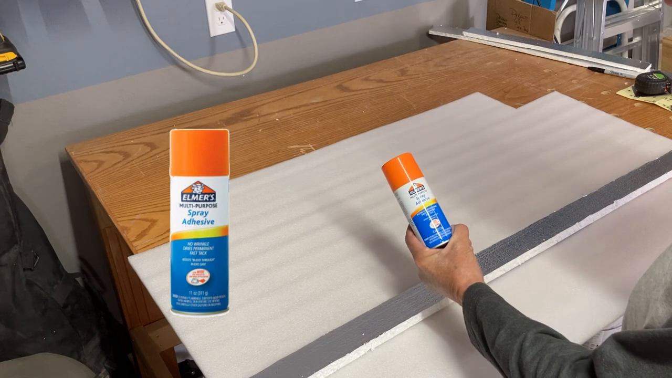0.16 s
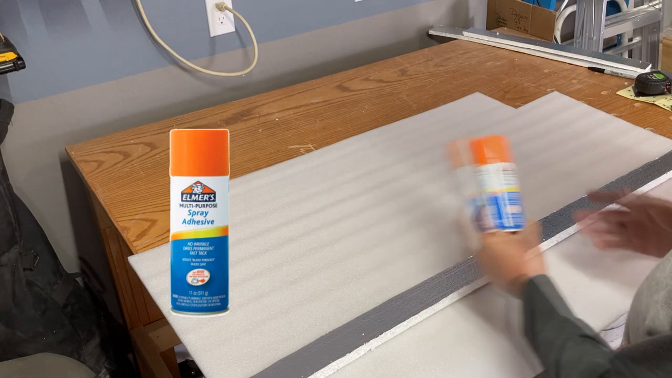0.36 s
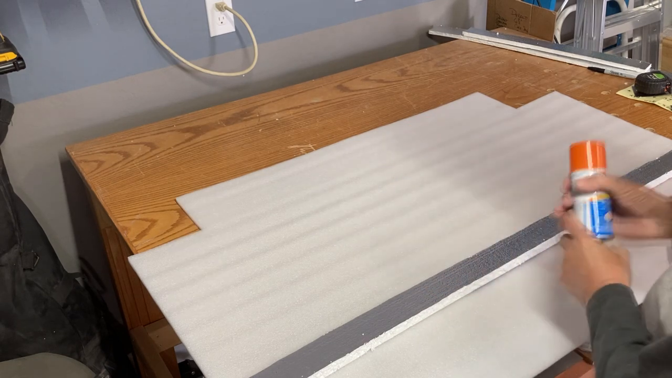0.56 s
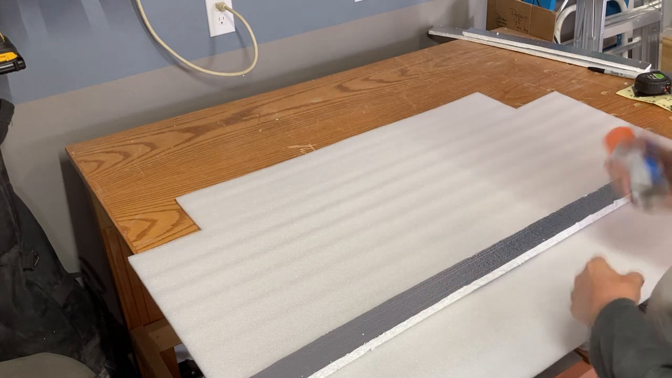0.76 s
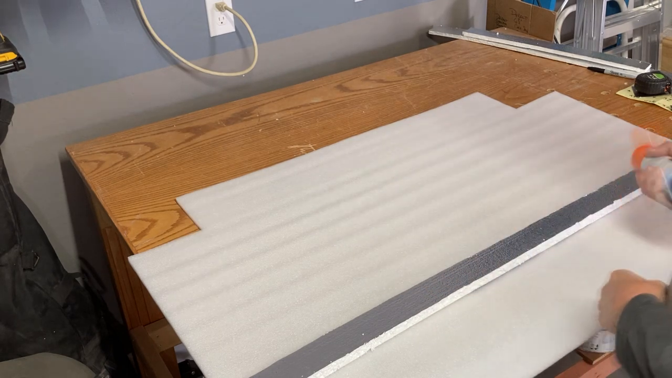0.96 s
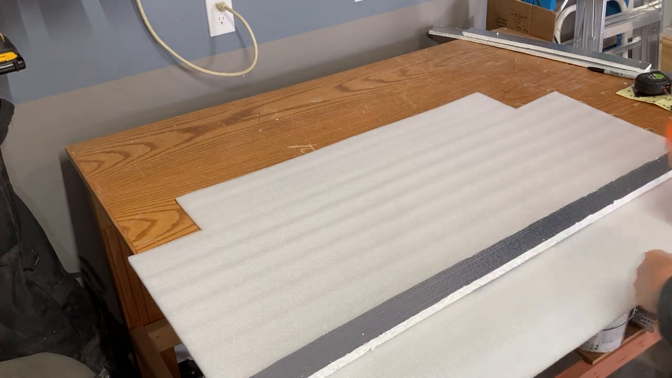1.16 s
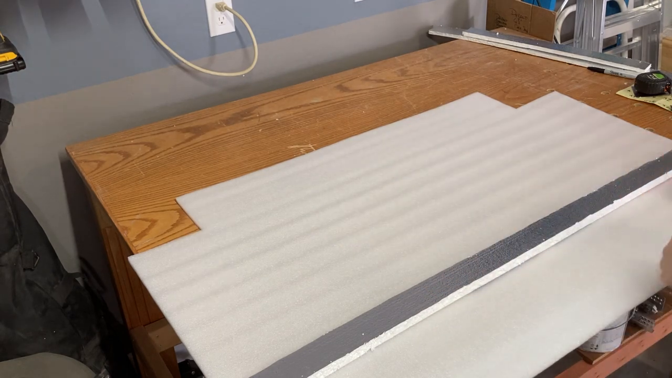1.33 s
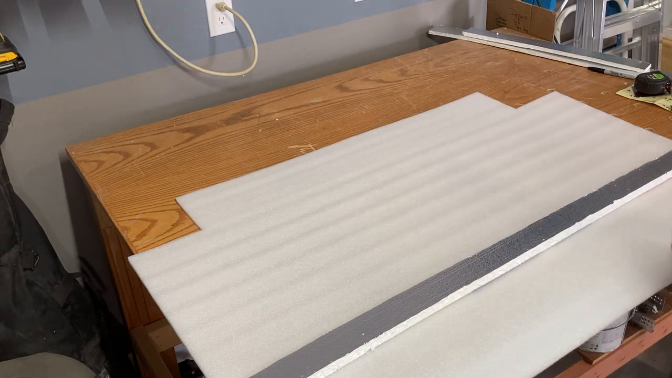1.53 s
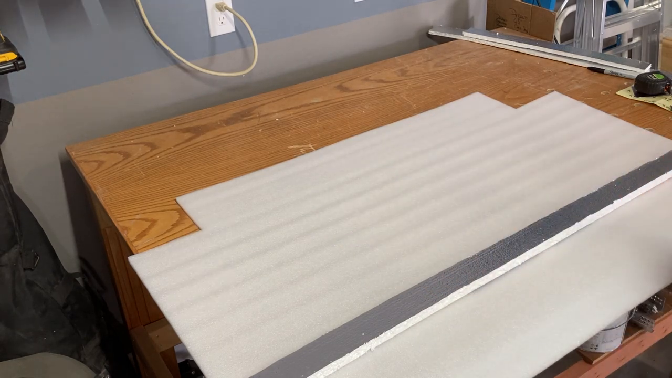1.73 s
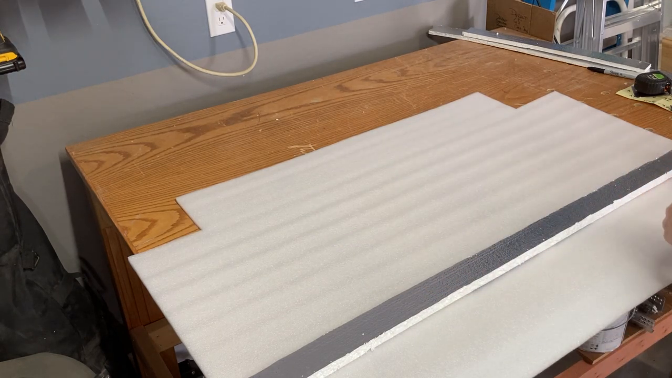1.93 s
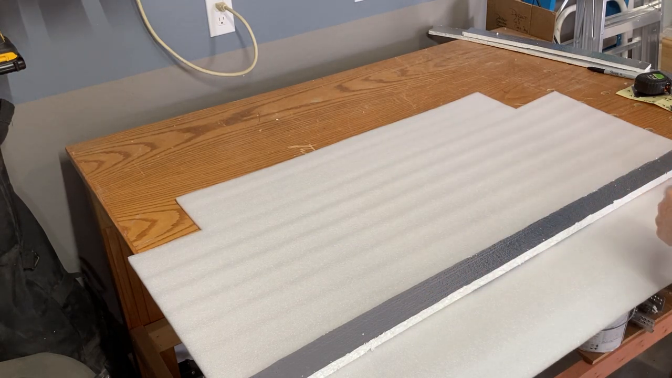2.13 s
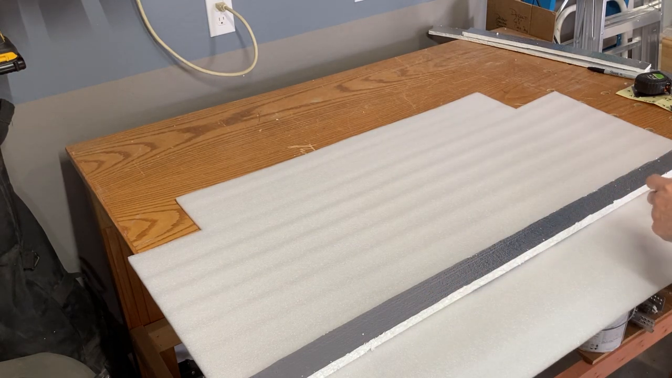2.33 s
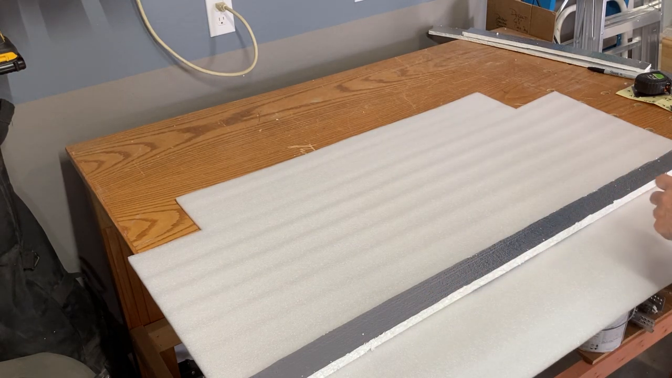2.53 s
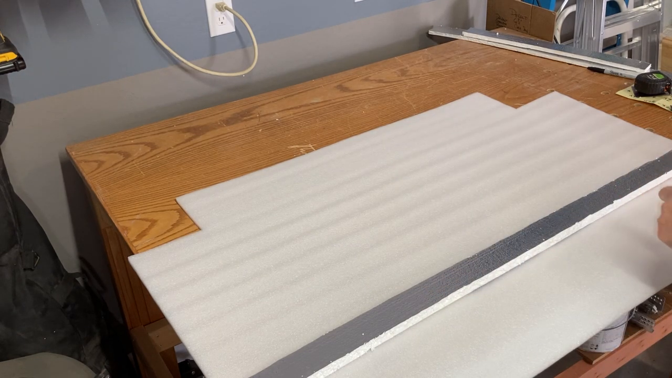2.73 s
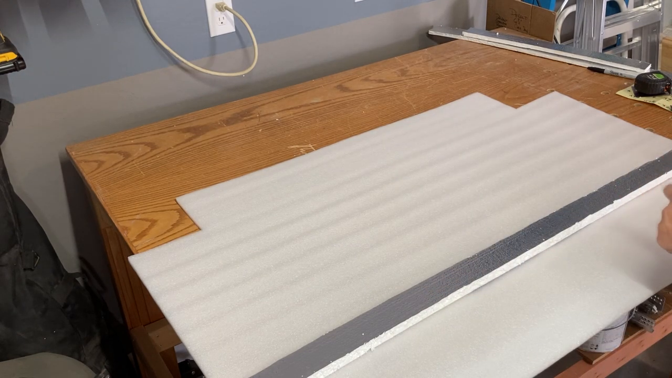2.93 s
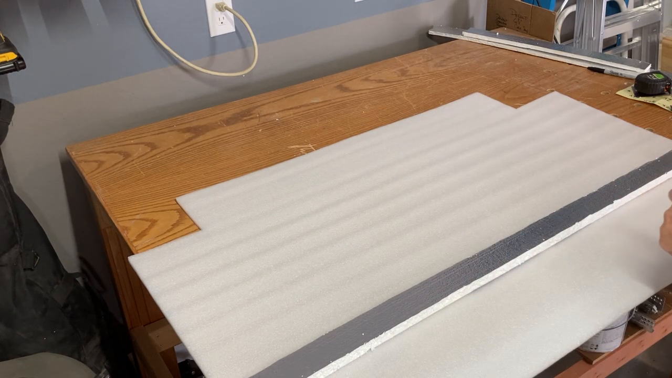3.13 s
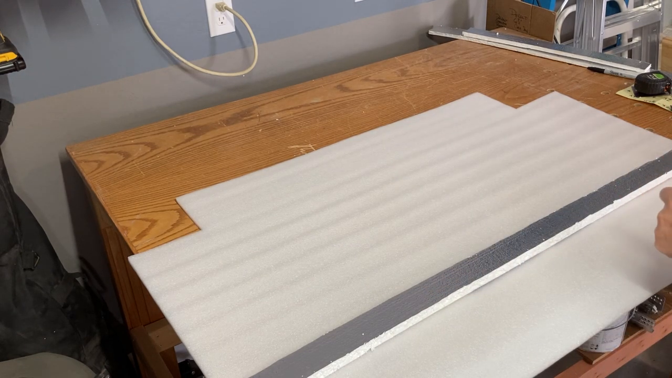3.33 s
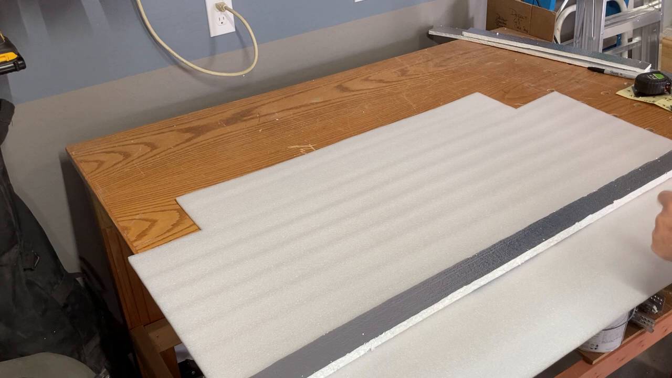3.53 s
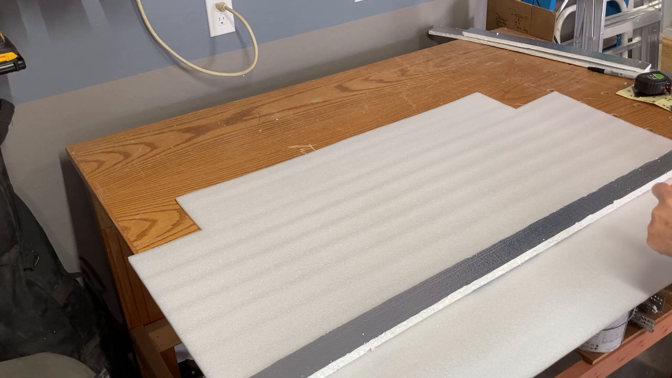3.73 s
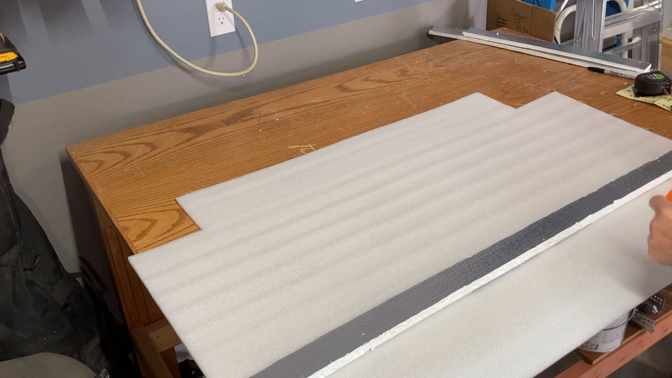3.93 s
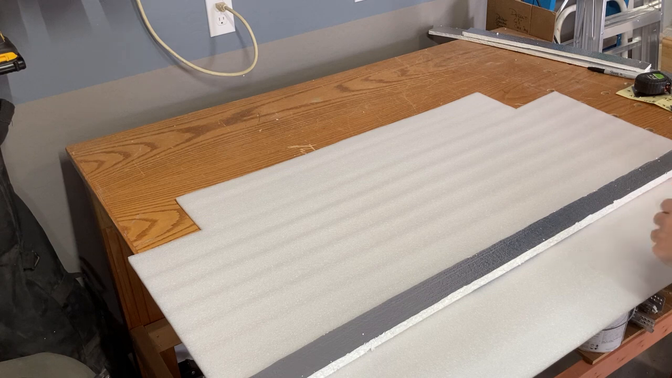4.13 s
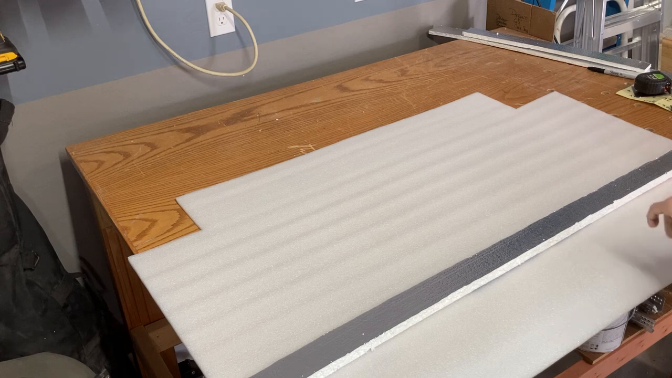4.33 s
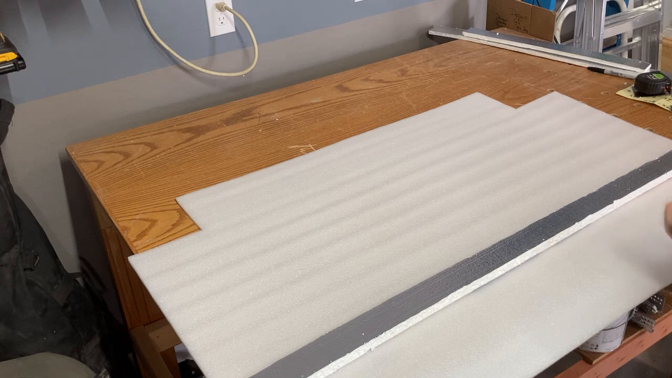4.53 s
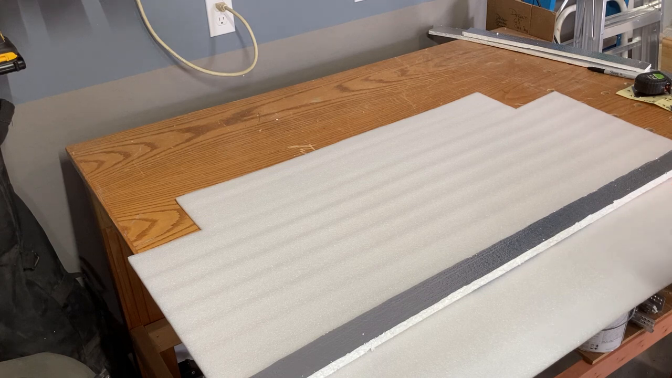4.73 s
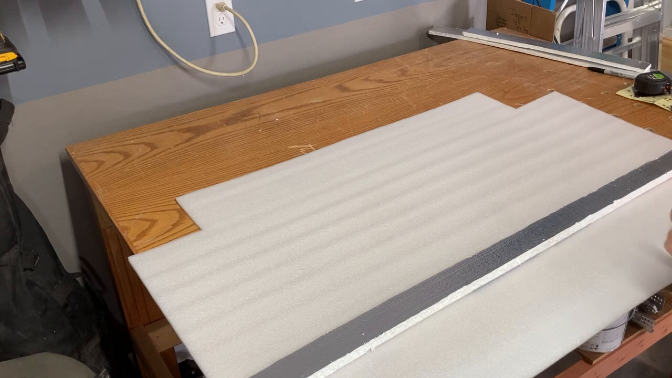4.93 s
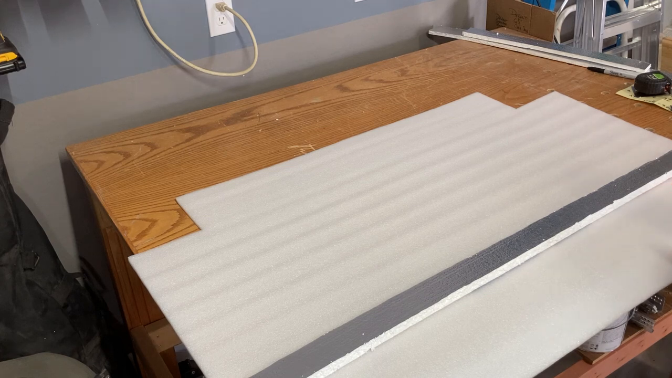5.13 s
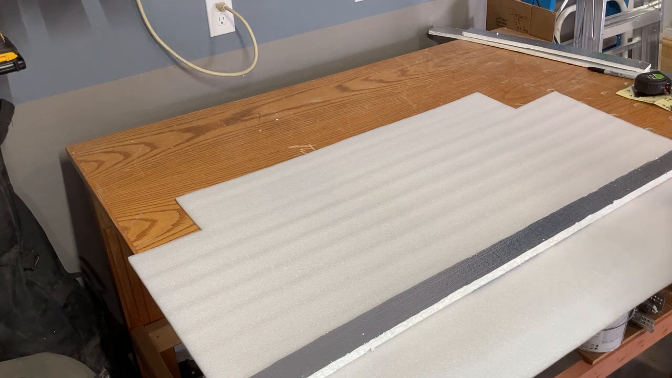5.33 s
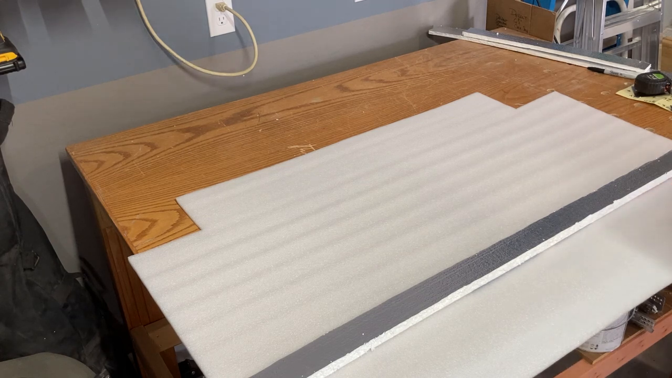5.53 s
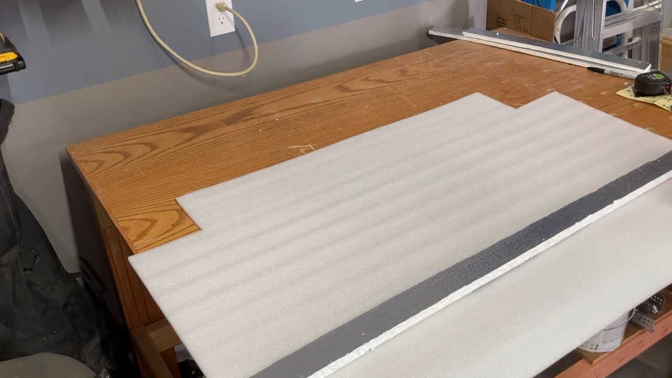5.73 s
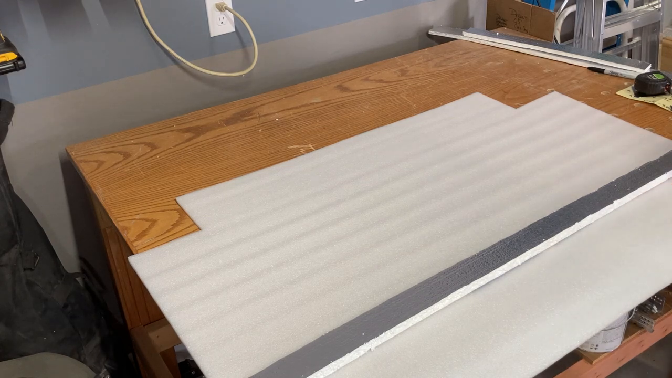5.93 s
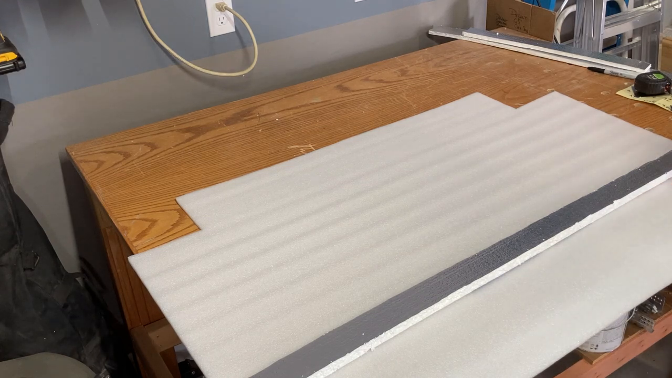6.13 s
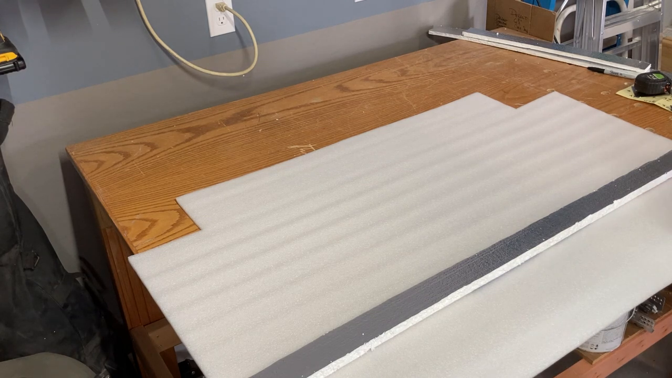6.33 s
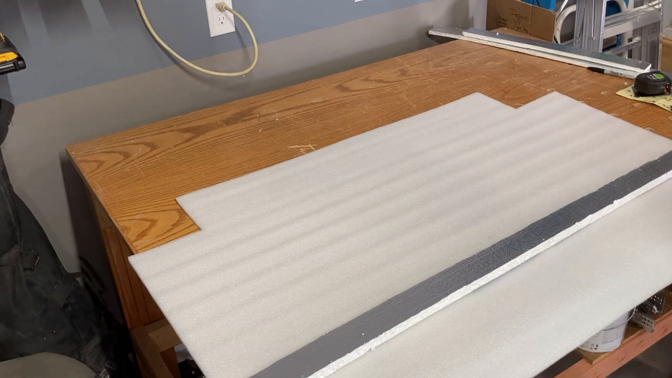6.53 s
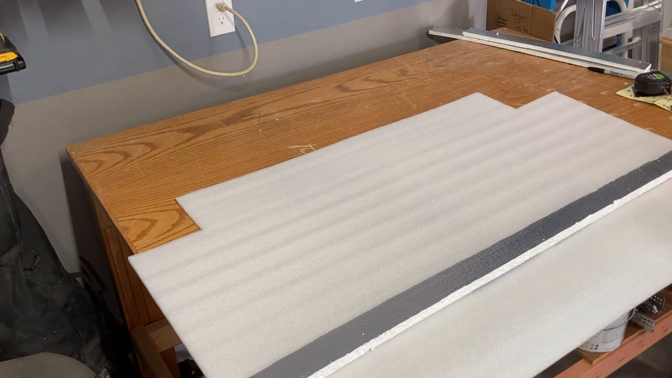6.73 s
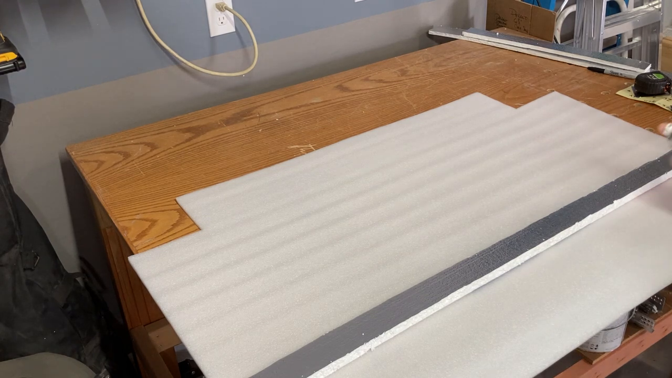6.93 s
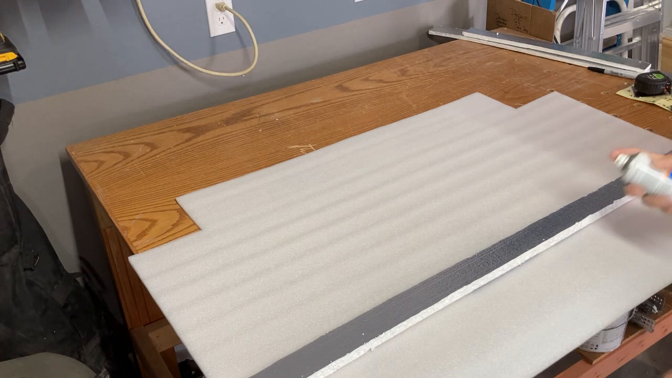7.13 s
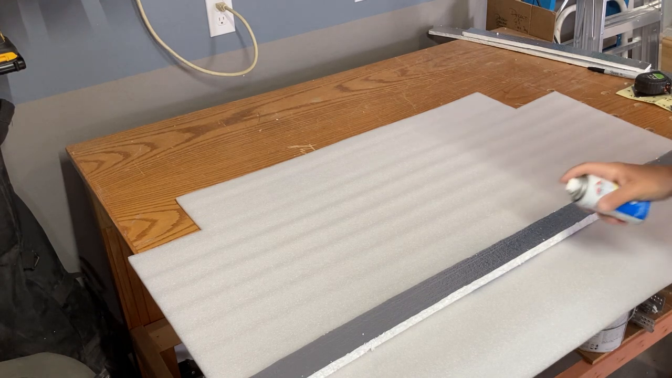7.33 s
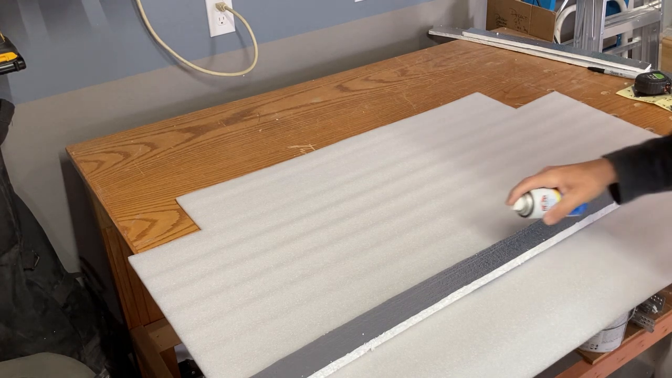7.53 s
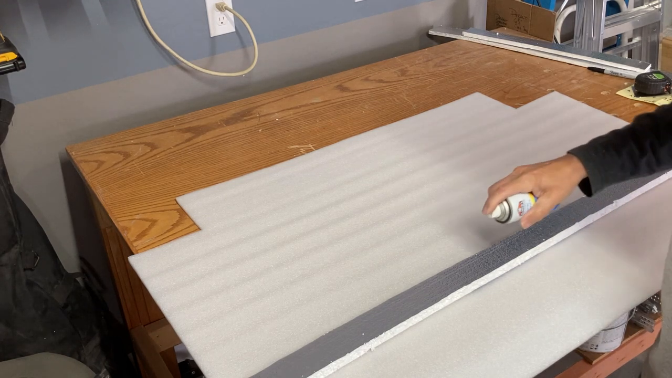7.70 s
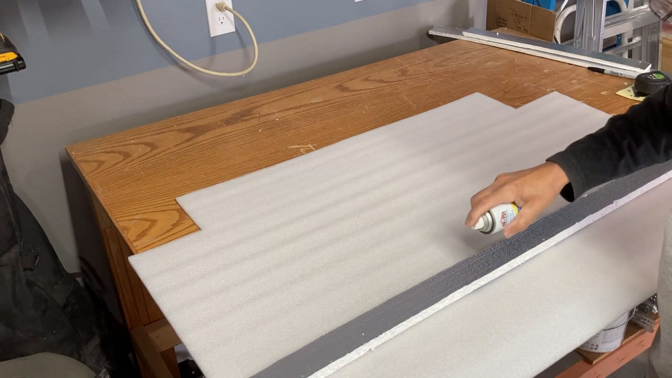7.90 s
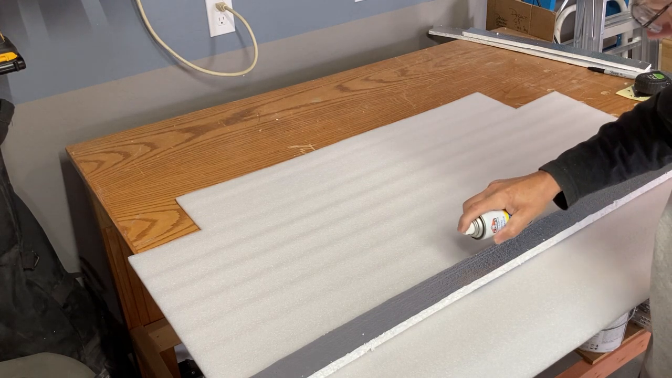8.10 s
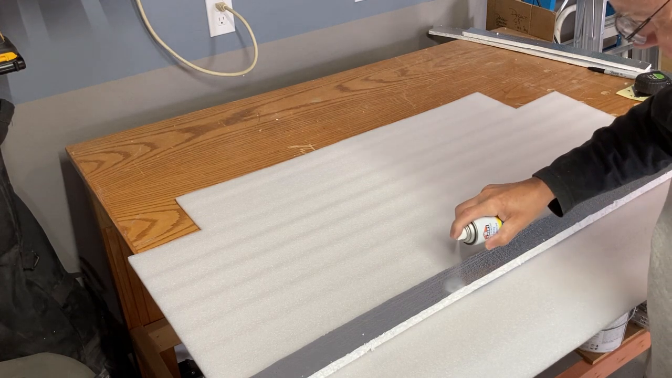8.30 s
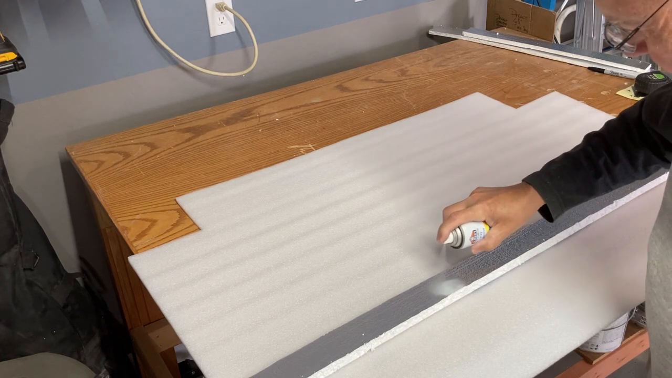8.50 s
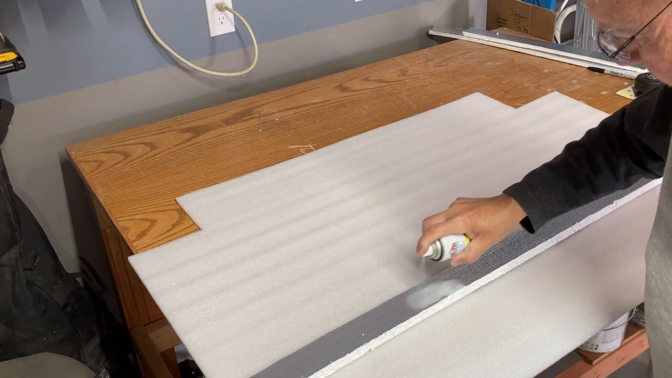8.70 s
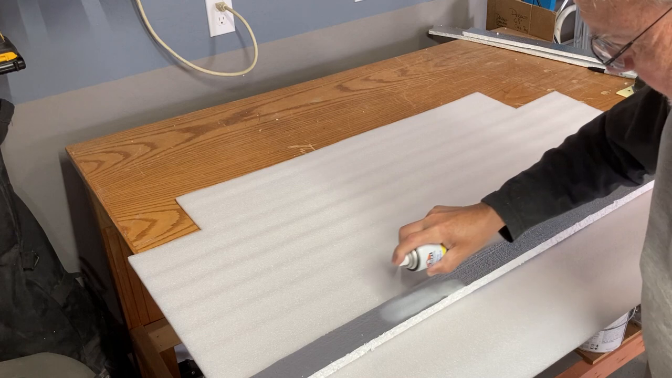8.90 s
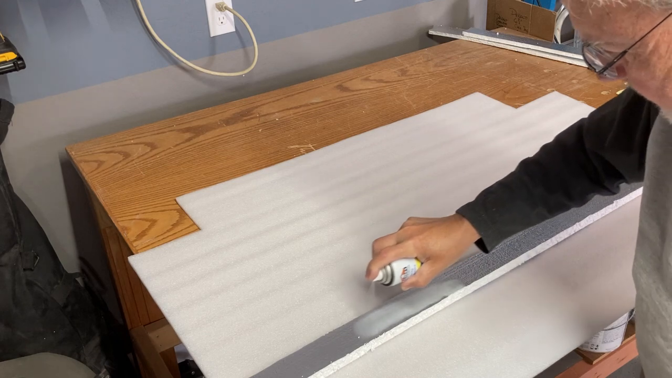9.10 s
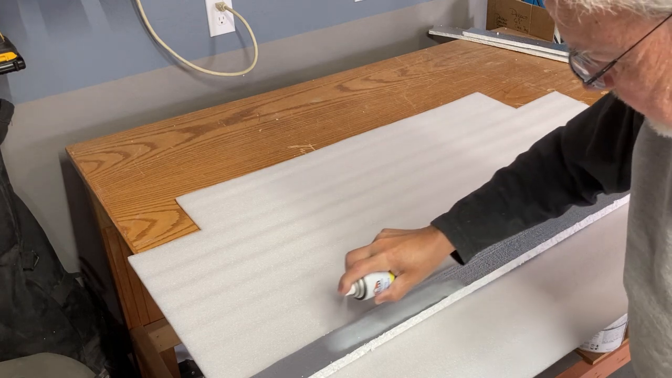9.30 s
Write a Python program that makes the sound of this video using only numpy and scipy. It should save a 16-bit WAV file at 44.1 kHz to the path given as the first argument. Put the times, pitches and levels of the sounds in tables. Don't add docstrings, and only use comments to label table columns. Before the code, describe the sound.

In a bare garage, an aerosol can is shaken briskly, its loose ball clacking irregularly on thin metal. Quieter sleeve rustles and small clicks follow, with a thump and hollow plastic pops as the cap works loose. After a near-quiet pause the nozzle clicks and bright glue spray hisses until the end. A close stereo microphone catches short room reverberation over faint low rumble.

```python
import sys
import numpy as np
from scipy import signal
from scipy.fft import rfft, irfft, next_fast_len
from scipy.io import wavfile
from scipy.ndimage import map_coordinates

SR = 44100
rng = np.random.default_rng(int(sys.argv[2]) if len(sys.argv) > 2 else 0)


def invert_db(x):
    u = np.asarray(x, float) / 20
    return 10 ** u


def wav_out(sig):
    wavfile.write(sys.argv[1], SR, np.round(np.clip(np.atleast_2d(sig).T, -1, 1) * 32767).astype(np.int16))


N = 417186
STEADY_TOP_HZ = 15850
SWELL_DB, FADE_DB_PER_S = 27, 174.5


def at_hz(points, hz):
    table_hz, value = np.array(points).T
    return np.interp(np.log(hz + 1), np.log(table_hz), value)


def in_time(rows):
    s, *columns = np.transpose(rows)
    return [np.interp(np.arange(N) / SR, s, column) for column in columns]


def rms_one(x):
    return x / np.sqrt(np.mean(x ** 2) + 1e-20)


def drift(rate_hz):
    r = np.exp(-80 * np.pi * rate_hz / SR)
    slow = signal.lfilter([1], [1, -2 * r, r * r], rng.standard_normal(N // 40 + 2002))[2000:]
    return np.interp(np.arange(N) / 40, np.arange(len(slow)), rms_one(slow))


def coloured(spectrum, channels=1):
    size = next_fast_len(N)
    hz = np.fft.rfftfreq(size, 1 / SR)
    shape = invert_db(at_hz(spectrum, hz)) * (hz < STEADY_TOP_HZ)
    white = rng.standard_normal((channels, size))
    return rms_one(irfft(rfft(white) * shape, size)[:, :N])


def tent(peak_s, peak_db, rise_db_per_s, fall_db_per_s):
    t = np.arange(N) / SR - peak_s
    slope_db = np.minimum(rise_db_per_s * t, -fall_db_per_s * t)
    return invert_db(np.maximum(peak_db + slope_db, -200))


def friction_stroke(peak_s, swell_s, db):
    return tent(peak_s, db, SWELL_DB / max(swell_s, .005), FADE_DB_PER_S)


def resonance(x, hz, t60):
    r = invert_db(-60 / (t60 * SR))
    out = signal.lfilter([1, 0, -1], [1, -2 * r * np.cos(2 * np.pi * hz / SR), r * r], x)
    return out / np.abs(out).max()


def impulse(seconds):
    return 1. * (np.arange(int(seconds * SR)) == 0)


def add(out, s, sound):
    at = round(s * SR)
    out[at:at + len(sound)] += sound[:N - at]


def clacks(events, bench_db, rough, scuff_s, wall_db, crack_db):
    ring_t60_s = .009
    wall_hz, wall_t60_s, wall_spread = 3700, 0.0015, .12
    crack_hz, crack_t60_s = 9720, 0.00079
    body_hz, body_t60_s, body_db = 615, 0.0032, -5.5
    ring_reach, wall_reach, crack_reach = invert_db([[0], [-1.5]]), invert_db([[0], [1]]), invert_db([[0], [-6]])
    bench_echo_ms = 6.7

    out = np.zeros((N, 2))
    t = np.arange(int(.05 * SR)) / SR
    even = (t == 0) * np.sqrt(1 + rough ** 2 * np.sum(invert_db(-120 * t / scuff_s)))
    scuffs = rng.standard_normal((len(events), 3, len(t)))
    for (s, ring_db, hz, click_db), scuff in zip(events, scuffs):
        contact = (t == 0) + rough * scuff * invert_db(-60 * t / scuff_s)
        this_wall_hz = wall_hz * np.exp(wall_spread * scuff[0, -1])
        ring = invert_db(ring_db + 6.5) * ring_reach * resonance([contact[0], even], hz, ring_t60_s)
        wall = invert_db(click_db + wall_db) * wall_reach * resonance([contact[1], even], this_wall_hz, wall_t60_s)
        crack = invert_db(click_db + crack_db) * crack_reach * resonance([contact[2], even], crack_hz, crack_t60_s)
        body = invert_db(click_db + body_db) * resonance([contact[1], even], body_hz, body_t60_s)
        add(out, s, (ring - wall + crack - body).T)
    direct, around = signal.sosfilt(signal.butter(1, 600.0, "high", fs=SR, output="sos"), out.T)
    bench_echo = invert_db(bench_db) * np.roll(direct, round(bench_echo_ms * SR / 1000))
    return np.array([direct + bench_echo, around])


def shaken_can():
    # start_s, hollow_ring_db, ring_hz, click_db
    strikes = [(0.7189, -25, 2120, -27), (0.8089, -29, 1640, -36), (0.898, -29.5, 1760, -32),
               (0.9408, -20, 1690, -27.5), (1.0326, -29, 1150, -17), (1.2108, -23, 1560, -26.5),
               (1.4106, -20, 1880, -24), (1.501, -24.5, 1640, -24), (1.6168, -23, 1205, -23.5),
               (1.698, -13, 2090, -24), (1.743, -33.5, 2140, -27.5), (1.8476, -21, 2060, -19.5),
               (1.9076, -20, 1880, -27), (1.949, -18, 2070, -24.5), (2.0436, -15, 2080, -17.5),
               (2.148, -32, 1800, -36), (2.2418, -25.5, 1090, -15), (2.3291, -22.5, 2060, -22.5),
               (2.379, -24, 1980, -25.5), (2.4708, -44.5, 1840, -17.5), (2.578, -31, 1190, -34)]
    # start_s,
    # hollow_ring_db, ring_hz, click_db
    rebounds = [(0.5462, -51.5, 2260, -52.5), (0.7335, -31, 2260, -42), (0.823, -46, 1680, -40.5),
                (0.981, -30.5, 1780, -37), (1.001, -59, 1320, -35.5), (1.0476, -42, 1830, -33.5),
                (1.0622, -27, 1690, -41.5), (1.234, -40, 1400, -51), (1.279, -35, 2005, -54),
                (1.421, -29, 1880, -42), (1.5166, -21.5, 2120, -30.5), (1.5258, -37.5, 2130, -43.5),
                (1.651, -38, 1180, -58), (1.6741, -38, 1110, -36.5), (1.7546, -47, 2260, -33.5),
                (1.8, -48.5, 1890, -49.5), (1.86, -19, 2520, -17), (1.9262, -35.5, 2420, -34.5),
                (2.1684, -24, 1170, -29), (2.1947, -45, 1160, -42), (2.2233, -48, 2080, -33.5),
                (2.2541, -27.5, 2180, -29.5), (2.4125, -25.5, 1800, -41.5), (2.4931, -22, 1930, -25),
                (2.6151, -31.5, 2120, -34.5), (2.6454, -34.5, 1800, -57.5), (1.852, -29.5, 1130, -51.5),
                (1.953, -27.5, 1130, -51), (2.048, -30, 1150, -49.5), (2.384, -27, 1150, -51.5)]
    return clacks(strikes + rebounds, bench_db=-5, rough=0.17, scuff_s=.014, wall_db=11.5, crack_db=15)


def nozzle_button():
    # start_s, hollow_ring_db, ring_hz, click_db
    presses = [
        (7.9973, -64, 2080, -70),
        (8.1449, -30, 2030, -36),
        (8.2038, -46, 2020, -40),
        (8.2778, -50, 1720, -45),
        (8.3224, -48, 1830, -44),
        (8.3592, -53, 1900, -47),
    ]
    return clacks(presses, bench_db=-12, rough=0.3, scuff_s=0.015, wall_db=13.5, crack_db=19.5)


def jet():
    # time_s, flow_db
    flow_points = [
        (8.2, -50.5),
        (8.276, -36.5),
        (8.584, -36.5),
        (8.7, -39),
        (8.8, -38),
        (8.84, -40),
        (9.46, -36),
    ]
    # peak_s, peak_db
    spits = [
        (8.148, -55),
        (8.206, -40.5),
    ]
    # frequency_hz, density_db_per_hz
    hiss_colour = [(500, -30), (900, -21), (2200, -14), (3750, -14), (4800, -9.5), (7500, -5.5),
                   (10000, -1), (15700, -3)]
    # time_s, delay_ms
    foam_path = [(8.14, .38), (8.8, .4), (9.1, .435), (9.3, .45), (9.46, .48)]

    flow = invert_db(in_time(flow_points)[0]) * (np.arange(N) / SR > spits[0][0])
    for s, db in spits:
        flow = flow + tent(s, db, rise_db_per_s=1500, fall_db_per_s=1300)
    flicker_db = 1.14 * drift(130) + 0.72 * drift(4.0)
    hiss = coloured(hiss_colour)[0] * invert_db(flicker_db)
    delay = in_time(foam_path)[0] * SR / 1000
    bounce = map_coordinates(hiss, [np.arange(N) - delay], order=3)
    spray = invert_db(-1) * flow * (hiss + .36 * bounce)
    return signal.sosfilt(signal.cheby2(10, 50, STEADY_TOP_HZ + 450, fs=SR, output="sos"), spray)


def cap_clacks():
    # start_s, hollow_ring_db, ring_hz, click_db
    contacts = [(2.8884, -39.5, 1550, -68), (2.8929, -31.5, 1930, -43), (3.2036, -36.5, 1310, -47),
                (3.3376, -43.5, 2220, -53), (3.4988, -47, 1950, -56), (3.5512, -56.5, 1154, -58.5),
                (4.137, -80, 1780, -65), (4.1852, -46, 1900, -50), (4.2787, -46, 1190, -54),
                (4.3959, -44.5, 1900, -73), (4.5855, -48.5, 1050, -65.5), (4.7595, -37, 970, -35),
                (5.1314, -31, 2150, -38.5), (5.1552, -32, 2360, -46), (5.2131, -17.5, 2094, -17),
                (5.2485, -27, 2190, -51.5), (5.2948, -15.5, 2010, -31.5), (5.4646, -23, 1840, -19),
                (5.5597, -28, 1390, -30.5), (5.6576, -40, 1740, -44.5), (5.8235, -33.5, 2015, -44.5),
                (5.8914, -41, 2064, -55), (6.5144, -53.5, 2213, -60.5), (6.8003, -57.5, 1918, -77),
                (7.4255, -67.5, 1575, -49)]
    return clacks(contacts, bench_db=-6, rough=0.13, scuff_s=0.011, wall_db=15, crack_db=17)


def pops():
    # start_s, peak_db, cavity_hz, overtone_db re peak
    cap_pops = [
        (4.76, -27, 1080, -26),
        (4.764, -29, 1117, -33),
        (4.95, -48, 1183, -21),
        (5.993, -42, 1072, -16.5),
        (6.001, -25, 1105, 6),
        (6.007, -23, 1122, -4),
        (6.017, -23, 1074, -31),
        (6.024, -24, 1044, 4.5),
    ]
    out = np.zeros(N)
    kick = impulse(.1)
    for s, db, hz, over_db in cap_pops:
        note = resonance(resonance(kick, hz, .03), hz, 0.0066)
        over = resonance(resonance(kick, 2 * hz, .002), 2 * hz, .0015)
        add(out, s, invert_db(db + 4.0) * (note + invert_db(over_db) * over))
    return signal.sosfilt(signal.butter(2, 3000.0, fs=SR, output="sos"), out)


def twists():
    # peak_s, swell_s, level_db
    turns = [
        (5.075, .2, -63),
        (5.19, .1, -43.5),
        (5.83, .05, -70.5),
        (5.95, .3, -58.5),
        (6.53, 0.12, -69),
        (6.64, .3, -93),
        (7.9, 0.067, -77),
    ]
    hollow = coloured([(1200, -28.5), (1800, -1), (2200, 3.5), (2700, -3.5), (3500, -20)])[0]
    scrape = hollow * invert_db(3.0 * drift(60))
    return scrape * np.max([friction_stroke(*turn) for turn in turns], axis=0)


def cluster(hz, t60, spread, chance):
    t = np.arange(int(.12 * SR)) / SR
    pitches = hz * np.exp(spread * chance[:, None])
    modes = np.sin(2 * np.pi * pitches * t).sum(axis=0) / np.sqrt(len(chance))
    return modes * invert_db(-60 * t / t60) * np.minimum(t / 0.0015, 1)


def knocks():
    # start_s, peak_db
    blows = [(0.544, -56), (4.745, -48.5), (4.758, -24.5), (4.799, -37.5), (5.212, -46.5), (5.464, -48),
             (5.558, -40.5), (6.002, -34.5), (6.799, -48), (7.407, -46), (8.148, -43.5)]
    thud_hz, thud_t60_s, modes_t60_s = 460, .004, .05
    out = np.zeros(N)
    hump = resonance(resonance(impulse(.12), thud_hz, thud_t60_s), thud_hz, thud_t60_s)
    chances = rng.uniform(-0.53, 1, (len(blows), 16))
    for (s, db), chance in zip(blows, chances):
        modes = cluster(0.55 * thud_hz, modes_t60_s, 1.0, chance)
        add(out, s, invert_db(db) * (hump + 0.35 * modes))
    return out


def rustle():
    # peak_s, swell_s, rub_db, bright_db re rub
    strokes = [(0.549, .02, -67, 5.5), (2.949, 0.023, -62, -3.5), (3.202, 0.017, -57.5, -8),
               (3.25, 0.041, -62.5, -5), (3.34, .03, -60, -11), (3.522, 0.018, -61.5, -3.5),
               (3.758, 0.1, -84, 6), (3.979, .04, -70.5, -1), (4.198, .04, -55, -5.5),
               (4.412, 0.13, -62, -7.5), (4.586, 0.071, -67, 0), (4.74, 0.057, -73, -1),
               (5.04, 0.065, -66.5, -10.5), (5.098, 0.13, -66, -26), (5.819, 0.058, -52.5, -16.5),
               (5.894, 0.053, -63, 3), (5.972, 0.26, -55.5, -7.5), (6.514, 0.083, -72.5, -9),
               (6.798, 0.041, -75.5, -6), (7.1, 0.25, -83, -5), (7.405, 0.019, -62, -1),
               (7.45, 0.065, -57, -3), (7.509, 0.11, -73, -13), (7.906, 0.19, -74.5, -1),
               (8.041, 0.017, -54.5, -9), (8.12, 0.14, -60, -10)]
    grain = invert_db(2.0 * drift(41))
    rub = coloured([(300, -15), (1000, -7), (2500, -3), (4500, -7.5), (9000, -31.5)])[0]
    sheen = coloured([(3500, -29.5), (6000, -2), (9000, 4.5), (12000, -1.5), (16000, -25.5)])[0]
    dull, bright = np.zeros((2, N))
    for s, swell_s, db, bright_db in strokes:
        stroke = friction_stroke(s, swell_s, db + 1.0)
        dull = np.maximum(dull, stroke)
        bright = np.maximum(bright, invert_db(bright_db) * stroke)
    return grain * (dull * rub + bright * sheen)


def garage():
    # delay_ms, level_db
    wall_echoes = [(9.5, -17), (15.5, 1), (19.5, -21), (30, -2.5)]
    # frequency_hz, t60_s
    decay = [(150, 0.98), (800, 0.86), (2000, 0.63), (5500, 0.49), (14000, 0.44)]

    t = np.arange(SR) / SR
    white, tail = rng.standard_normal((2, SR)), 0
    for low in 15700 / 2 ** np.arange(.5, 8.2, .5):
        band = signal.sosfilt(signal.butter(2, [low, low * np.sqrt(2)], "band", fs=SR, output="sos"), white)
        tail = tail + band * invert_db(-60 * t / at_hz(decay, low * 2 ** .25))
    puffs = 0
    for ms, db in wall_echoes:
        since = t - ms / 1000
        puffs = puffs + invert_db(db) * (since > 0) * invert_db(-60 * np.abs(since) / 0.0027)
    onset = np.clip((t - .003) / 0.0011, 0, 1)
    response = tail * (invert_db(-24.0) * onset + .3 * puffs)
    return signal.sosfilt(signal.cheby2(10, 50, STEADY_TOP_HZ, fs=SR, output="sos"), response)


def background():
    # time_s, rumble_db, air_db
    bed_levels = [(0.0, -62, -78.5), (9.46, -66.5, -75)]
    # frequency_hz, density_db_per_hz
    rumble_colour = [(20, -37.5), (36, -13), (50, -1), (64, -3.5), (80, -6), (120, -7), (200, -13.5),
                     (300, -12.5), (400, -22), (600, -49.5)]
    # frequency_hz, density_db_per_hz
    air_colour = [(250, -8.5), (450, -1), (700, -6.5), (1000, -12.5), (3000, -21), (16000, -30)]
    # start_s, end_s, pitch_hz, level_db
    far_drones = [
        (4.306, 5.613, 181.6, -67),
        (5.506, 7.485, 288.4, -68),
    ]

    t = np.arange(N) / SR
    rumble_db, air_db = in_time(bed_levels)
    swell_db = 1.2 * drift(4)
    rumble = coloured(rumble_colour, channels=2) * invert_db(rumble_db + swell_db)
    out = rumble + coloured(air_colour, channels=2) * invert_db(air_db)
    for start, end, hz, db in far_drones:
        fade = np.clip(np.minimum(t - start, end - t) / 0.25, 0, 1)
        level = invert_db(db + 1.5 + 1.7 * drift(4.5))
        out += fade * level * np.sin(2 * np.pi * hz * (t + 0.00013 * drift(3.8)))
    return out


def placed(x, left_lag):
    return np.array([np.roll(x, left_lag), x])


def scene():
    cap = cap_clacks() + pops() * invert_db([[0], [-6]])
    aside = shaken_can() + cap + knocks() + rustle() + twists()
    ahead = nozzle_button() + jet()
    room_feed = aside[1] + invert_db(-2) * ahead[1]
    room = signal.fftconvolve(room_feed[None], garage(), axes=1)[:, :N]
    return placed(aside[0], left_lag=6) + placed(ahead[0], left_lag=0) + room + background()


def roll_off(x):
    return signal.sosfilt(signal.butter(12, 16970, fs=SR, output="sos"), x)


def record(dry):
    # frequency_hz, share 0-1
    port_share = [(40, .92), (350, .82), (800, .1), (5600, .04), (6800, .86), (9150, .985), (11300, .87),
                  (13700, .97)]
    # frequency_hz, left_over_right_db
    left_lift = [(60, -1.7), (400, 0), (2000, 2.5), (4000, 1.6), (6500, -0.3)]
    twist_from_hz, twist_turn_hz = 2350, 4520
    top_hz = 16900

    size = next_fast_len(N + SR // 10)
    hz = np.fft.rfftfreq(size, 1 / SR)
    left, right = rfft(2.2 * np.tanh(dry / 2.2), size)
    share = np.clip(at_hz(port_share, hz), 0, 1)
    twist = np.exp(2j * np.pi * np.clip((hz - twist_from_hz) / twist_turn_hz, 0, 3))
    right = share * twist * left + np.sqrt(1 - share ** 2) * right
    lift = invert_db(at_hz(left_lift, hz) / 2)
    response = (hz < top_hz) / np.sqrt(1 + (30 / (hz + 1)) ** 6)
    ports = [left * response * lift, right * response / lift]
    return roll_off(irfft(ports, size)[:, :N])


dry = scene()
out = record(dry)
wav_out(out)
```